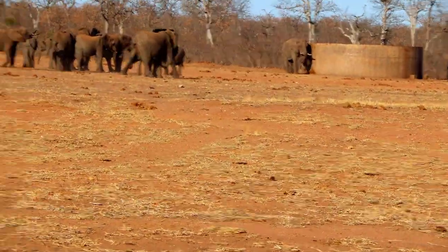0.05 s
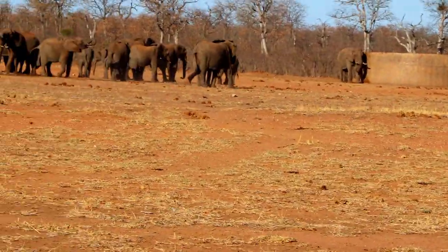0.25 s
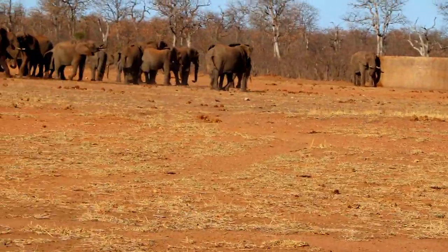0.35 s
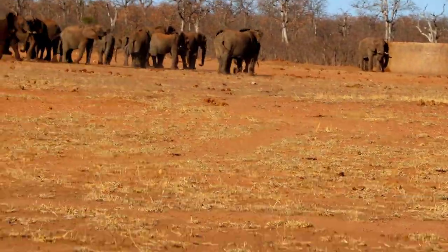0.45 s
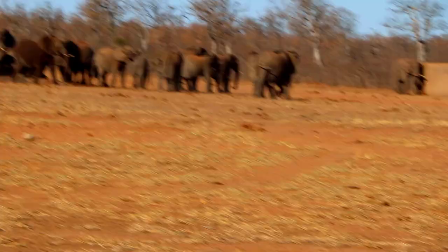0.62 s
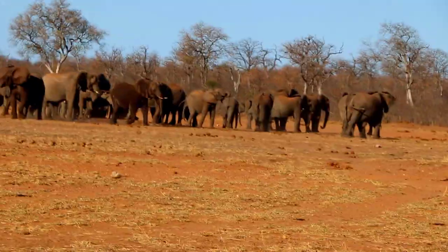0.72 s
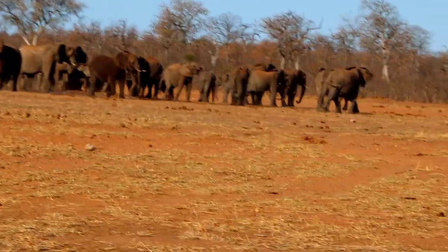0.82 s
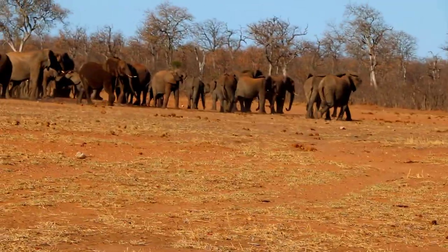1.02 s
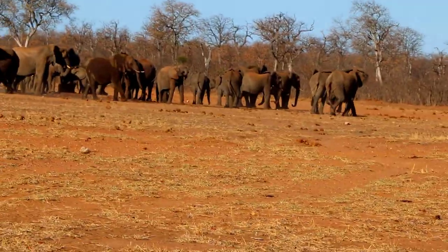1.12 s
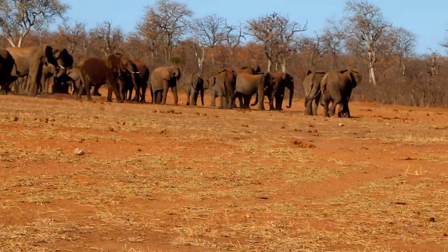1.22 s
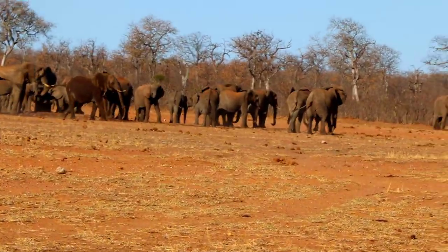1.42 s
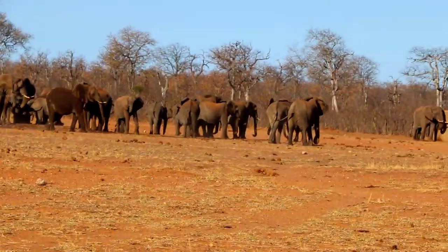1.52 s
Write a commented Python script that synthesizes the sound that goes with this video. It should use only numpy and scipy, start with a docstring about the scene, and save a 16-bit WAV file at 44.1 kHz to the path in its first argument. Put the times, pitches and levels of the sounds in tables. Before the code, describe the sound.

A rough, roar-like rasp swells and fades, like something dragging against the microphone. A dull bump ends it and rings low, leaving soft hiss and faint wind on a quiet open plain.

```python
"""On a quiet open plain, a rough, roar-like rasp swells and fades, perhaps something dragged along
the camera's casing: dense tiny slips excite its resonances and snag now and then. A dull bump ends
it and rings low. The gain control ducks the hiss and lets it creep back over faint wind and a thin
whine; a far rustle comes at the very end."""
import sys
import numpy as np
from scipy import signal
from scipy.fft import rfft, irfft
from scipy.io import wavfile
from scipy.ndimage import uniform_filter1d

SR = 44100
rng = np.random.default_rng(int(sys.argv[2]) if len(sys.argv) > 2 else 0)


def wrap_up_sound(samples):
    """Save the sound to the file named by the first command line argument, as 16-bit audio."""
    columns = np.atleast_2d(samples).T
    # keep every value between -1 and 1, then stretch to whole-number steps
    tamed = np.clip(columns, -1, 1)
    steps = np.round(tamed * 32767).astype(np.int16)
    wavfile.write(sys.argv[1], SR, steps)


N = 68355
T = np.arange(N) / SR


def amp(db):
    """Decibels to gain."""
    return 10 ** (np.asarray(db) / 20)


def unit(x):
    """Scales to rms 1."""
    return x / np.sqrt(np.mean(x ** 2) + 1e-20)


def curve(points):
    """Joins (seconds, value) points by straight lines."""
    return np.interp(T, *np.transpose(points))


def shape(x, points):
    """Filters x by an EQ curve of (Hz, dB) points."""
    hz, db = np.transpose(points)
    gain_db = np.interp(np.log(np.fft.rfftfreq(N, 1 / SR) + 1), np.log(hz), db)
    return irfft(rfft(x) * amp(gain_db), N)


def colour(x, points):
    """Applies an EQ curve, then scales to rms 1."""
    return unit(shape(x, points))


def resonate(x, hz, width_hz):
    """A steep resonance that can follow a moving frequency, at rms 1."""
    carrier = np.exp(2j * np.pi * np.cumsum(hz * np.ones(N)) / SR)
    pole = np.exp(-np.pi * width_hz / SR)
    baseband = signal.lfilter([1], [1, -2 * pole, pole * pole], x / carrier)
    return unit((carrier * baseband).real)


def noise():
    """White noise."""
    return rng.standard_normal(N)


def wander(rate_hz):
    """Random motion up to about the given rate."""
    rolloff = 1 + (np.fft.rfftfreq(N, 1 / SR) / rate_hz) ** 4
    return unit(irfft(rfft(noise()) / rolloff, N))


def ring(modes, t):
    """Dying sines, t seconds after a blow."""
    return sum(amp(db - 60 * t / t60) * np.sin(2 * np.pi * hz * t) for hz, db, t60 in modes)


def smooth(x, time_s):
    """A one-pole lag."""
    pole = np.exp(-1 / (time_s * SR))
    return signal.lfilter([1 - pole], [1, -pole], x)


def air():
    """A steady bed of soft outdoor air and hiss."""
    # Each row: frequency in Hz, relative level in dB.
    air_eq = [(20, 12), (100, 22.5), (200, 16), (400, 10), (800, 4.5), (1600, 1), (3200, -2.5),
              (7000, -6.5), (12000, -8), (16000, -10.5)]
    return amp(-47.5) * colour(noise(), air_eq)


def wind():
    """Faint gusts swell a narrow, low rumble."""
    # Each row: time in seconds, relative level in dB.
    gusts = [(0.0, 6), (0.7, -4), (1.0, 4.5), (1.15, -6.5), (1.55, -1)]
    return amp(-45 + curve(gusts)) * resonate(noise(), hz=45.4, width_hz=10.4)


def whine():
    """The camera's thin, high whine."""
    return amp(-72) * resonate(noise(), hz=9280, width_hz=45)


def grains(slips_per_s=4500, spread_db=3.5, hiss_gain=0.73):
    """Dense tiny slips of uneven size over a smooth hiss."""
    slips = (rng.random(N) < slips_per_s / SR) * noise()
    sizes = amp(spread_db * np.minimum(rng.exponential(1, N), 3))
    return unit(unit(slips * sizes) + hiss_gain * noise())


def rasp(judder_hz=90, judder_db=1.6):
    """Juddering grains sound a low body, resonances and gritty treble, catching harder early on."""
    # Hollow tones, and narrow ones singing in the grit.
    # Each row: centre in Hz, width in Hz, relative level in dB.
    hollow_modes = [(312, 18.7, -4.5), (345, 49, -5), (370.9, 44, 0), (575, 43, -9), (647.7, 32.4, -6.5),
                    (708, 30, -4)]
    singing_modes = [(865, 25, -15), (975, 25, -11), (1035, 25, -15), (1123, 25, -16), (1320, 35, -14),
                     (1460, 45, -8), (1705, 70, -8), (2030, 40, -14), (3150, 150, -12)]
    # The hollow tones drift up, sag and lift again. Each row: time in seconds, pitch factor.
    hollow_bend = [(0.0, 0.85), (0.12, 0.91), (0.2, 1.02), (0.27, 0.99), (0.45, 1.01), (0.53, .95),
                   (0.62, 0.88), (0.75, 1.04)]
    # Tone of the body and the grit. Each row: frequency in Hz, relative level in dB.
    body_eq = [(30, -31), (60, -17), (92, 4.5), (115, -7), (150, 0.5), (200, -11.5), (255, -19), (400, -18),
               (600, -16), (1000, -30.5), (4000, -72)]
    grit_eq = [(100, 4.5), (450, 0.5), (850, 0), (1200, -6.5), (1550, -1.5), (2200, -2), (3200, -1),
               (4000, -6), (5000, -10), (6100, -13.5), (6800, -21), (9000, -30.5), (14000, -51)]
    # Swells of the low layers, the grit and the singing. Each row: time in seconds, gain in dB.
    effort = [(0.0, -31), (0.05, -28), (0.1, -10.5), (0.2, -3.5), (0.3, 1), (0.39, 0.5), (0.52, -1.5),
              (0.6, -3), (0.68, -20), (0.745, -18), (0.8, -59)]
    grit_swell = [(0.0, -35), (0.12, -22), (0.21, -14), (0.31, -6), (0.4, -1.5), (0.48, -1.5), (0.55, -2.5),
                  (0.62, -6.5), (0.68, -13), (0.765, -17.5), (0.8, -62)]
    singing_swell = [(0.0, -35.5), (0.2, -8.5), (0.28, 1), (0.38, 0.5), (0.495, 2.5), (0.56, -6.5),
                     (0.65, -34), (0.765, -18), (0.79, -70)]
    # Harder bites. Each row: start and length in seconds, level in dB, centre and width in Hz.
    catches = [(0.14, 0.027, -38, 1500, 380), (0.23, 0.037, -33, 1920, 1500),
               (0.231, 0.023, -40.5, 4300, 810), (0.3, 0.053, -35, 1460, 1800),
               (0.264, .025, -38, 4200, 1200)]

    judder = unit(amp(judder_db * np.tanh(wander(judder_hz))))
    bend = curve(hollow_bend)
    hollow = sum(amp(db) * resonate(grains(), hz * bend, width) for hz, width, db in hollow_modes)
    singing = sum(amp(db) * resonate(grains(), hz, width) for hz, width, db in singing_modes)
    body = colour(grains(), body_eq)
    grit = colour(grains(), grit_eq)
    out = amp(curve(effort)) * (amp(-32.5) * hollow + amp(-33.5) * body)
    out += amp(-30 + curve(grit_swell)) * grit
    out += amp(-34.5 + curve(singing_swell)) * singing
    for start, length, db, hz, width in catches:
        progress = np.clip((T - start) / length, 0, 1)
        bite = np.sin(np.pi * np.sqrt(progress))
        out += amp(db) * bite * resonate(grains(), hz, width)
    return judder * out


def snags(t60_s=0.0071):
    """Sharp snags stand out of the rasp as crisp ticks of noise."""
    # Each row: start in seconds, relative level in dB.
    hits = [(0.2728, -17.5), (0.3947, -20), (0.467, -17)]
    # Each row: frequency in Hz, gain in dB.
    snag_eq = [(300, -7), (1700, 13.5), (4800, -4.5), (7000, -28), (14000, -51)]
    bursts = sum((T >= start) * amp(db - 60 * np.maximum(T - start, 0) / t60_s) for start, db in hits)
    return shape(bursts * noise(), snag_eq)


def knocks(rise_s=0.003, tick_t60_s=0.03):
    """The bump lands as three quick knocks and a faint late knock, each ringing the casing."""
    # Each row: start in seconds, relative level in dB.
    hits = [(0.7356, -17), (0.7434, -20), (0.7553, -19), (0.907, -42.5)]
    # Each row: frequency in Hz, relative level in dB, seconds to fall 60 dB.
    casing_modes = [(422, 2.5, 0.078), (545, -6, 0.077), (657, -11, 0.046), (183.6, 3, 0.052)]
    # Tone of the contact noise. Each row: frequency in Hz, relative level in dB.
    tick_eq = [(600, 1.5), (1200, 0.5), (2500, -13), (6000, -6.5), (9000, -18), (15000, -29)]
    out = np.zeros(N)
    for start, db in hits:
        t = np.maximum(T - start, 0)
        attack = 1 - np.exp(-t / rise_s)
        tick = amp(-15.5 - 60 * t / tick_t60_s) * colour(noise(), tick_eq)
        out += amp(db) * attack * (ring(casing_modes, t) + tick)
    return out


def boom(rise_s=0.068, shudder_t60_s=0.39):
    """The bump's low tail: close modes bloom and beat over a dying shudder."""
    # The bump and its soft rebound. Each row: start in seconds, relative level in dB.
    hits = [(0.7427, 0), (0.933, -24.5)]
    # Each row: frequency in Hz, relative level in dB, seconds to fall 60 dB.
    low_modes = [(85.98, 15, 0.2204), (91.08, 13.5, 0.223), (97.7, 8, 0.23)]
    out = np.zeros(N)
    for start, db in hits:
        t = np.maximum(T - start, 0)
        bloom = 1 - np.exp(-(t / rise_s) ** 2)
        shudder = amp(-12 - 60 * t / shudder_t60_s) * resonate(noise(), hz=71, width_hz=44)
        out += amp(db) * bloom * (ring(low_modes, t) + shudder)
    return out


def rustle():
    """A far rustle: one brief swell of bright noise."""
    # Each row: time in seconds, level in dB.
    swell = [(1.4, -90), (1.47, -66), (1.51, -55.5), (1.55, -71)]
    return amp(curve(swell)) * resonate(noise(), hz=2970, width_hz=1400)


def scene():
    """The rasp and the bump over the quiet plain, in mono."""
    return (rasp() + snags() + boom() + knocks() + wind() + rustle() + whine() + air())[None]


def recover(over_db, db_per_s):
    """Catches each peak and lets it sink at a steady rate."""
    return np.maximum.accumulate(over_db + db_per_s * T) - db_per_s * T


def gain_control(dry, threshold_db=-17.5, held_share=0.77):
    """Ducks fast on loud sound, returns partway, then creeps back."""
    level_db = 10 * np.log10(smooth(dry[0] ** 2, time_s=0.016) + 1e-12)
    over_db = np.maximum(level_db - threshold_db, 0)
    release_db = recover(over_db, db_per_s=80)
    creep_db = recover(held_share * over_db, db_per_s=2)
    duck_db = uniform_filter1d(np.maximum(release_db, creep_db), size=250)
    return dry * amp(-smooth(duck_db, time_s=0.0018))


def record(dry, cutoff_hz=15700):
    """Gain control, then a steep cut of the highest treble."""
    lowpass = signal.firwin(511, cutoff_hz, window=("kaiser", 9), fs=SR)
    return signal.oaconvolve(gain_control(dry), lowpass[None], "same")


dry = scene()
out = record(dry)
wrap_up_sound(out)
```